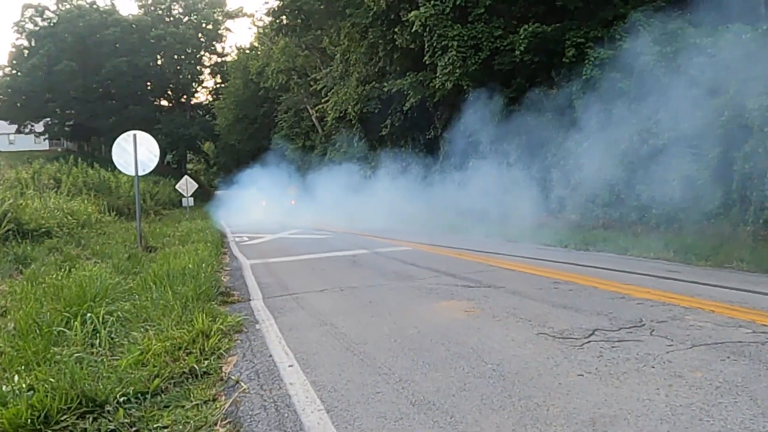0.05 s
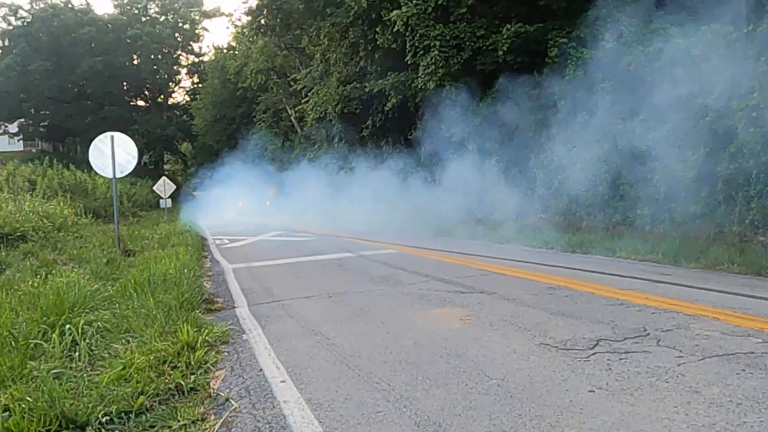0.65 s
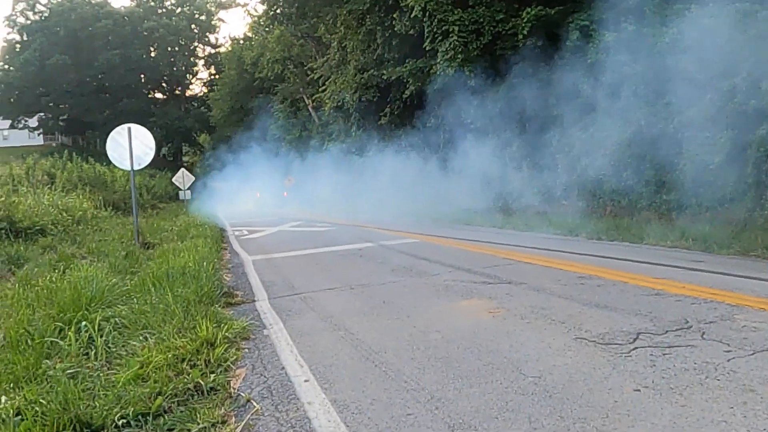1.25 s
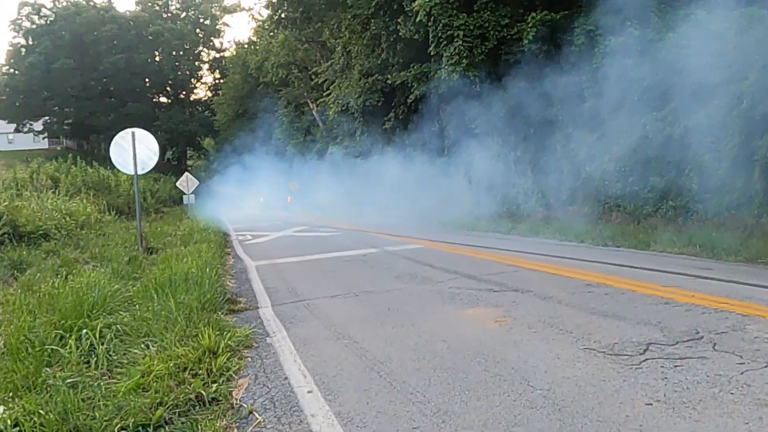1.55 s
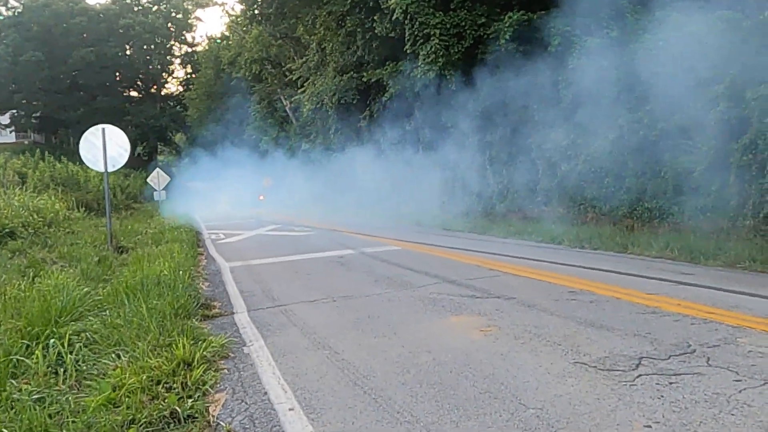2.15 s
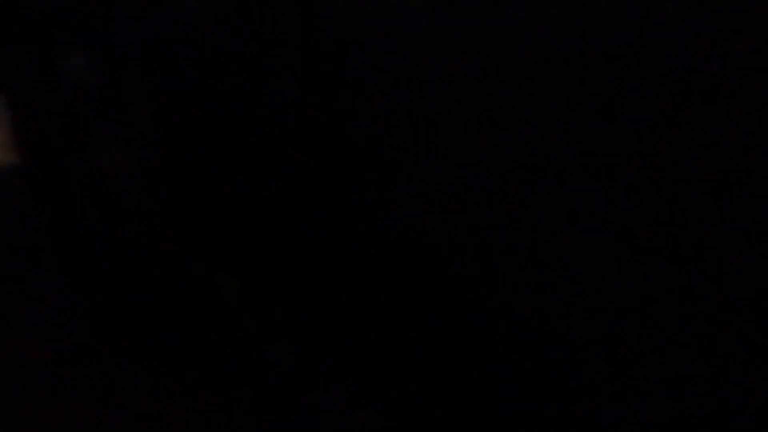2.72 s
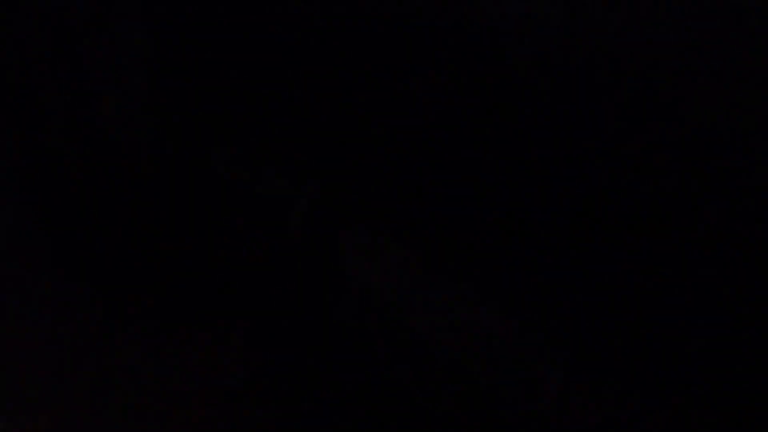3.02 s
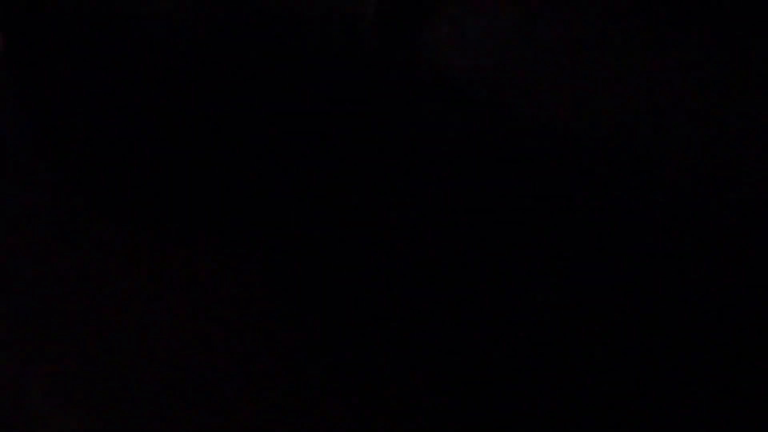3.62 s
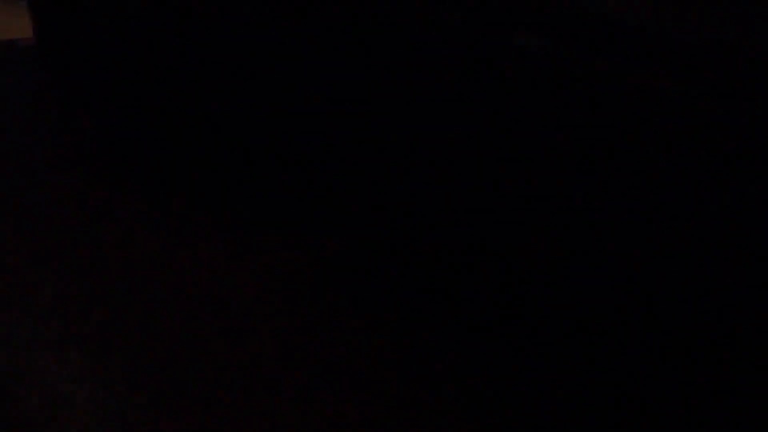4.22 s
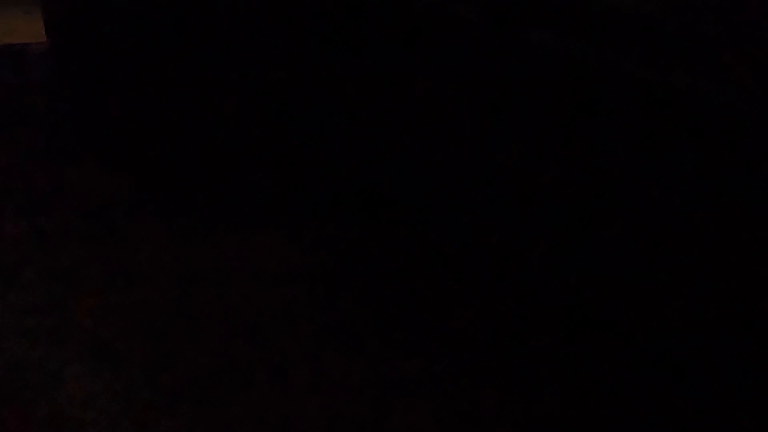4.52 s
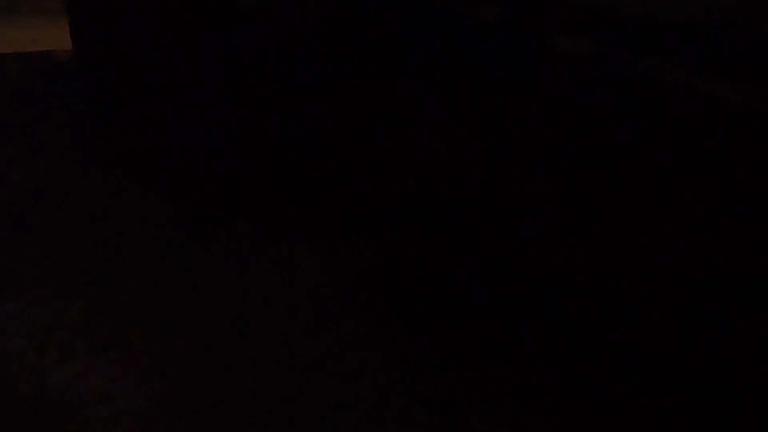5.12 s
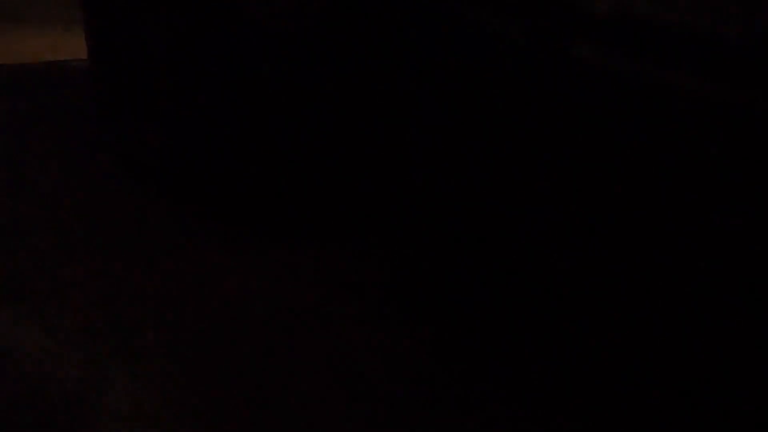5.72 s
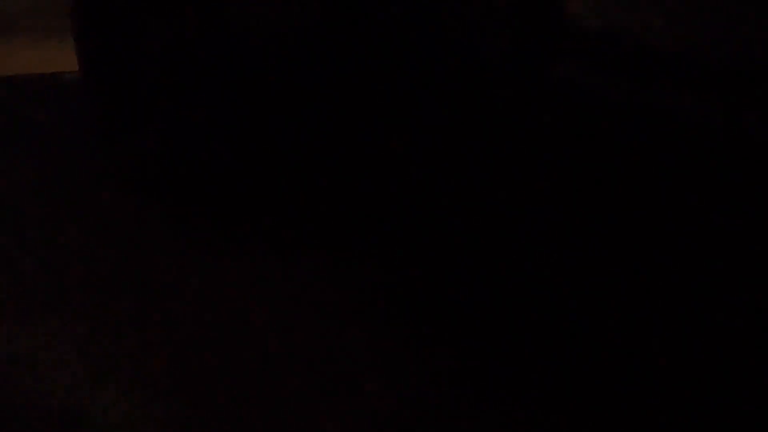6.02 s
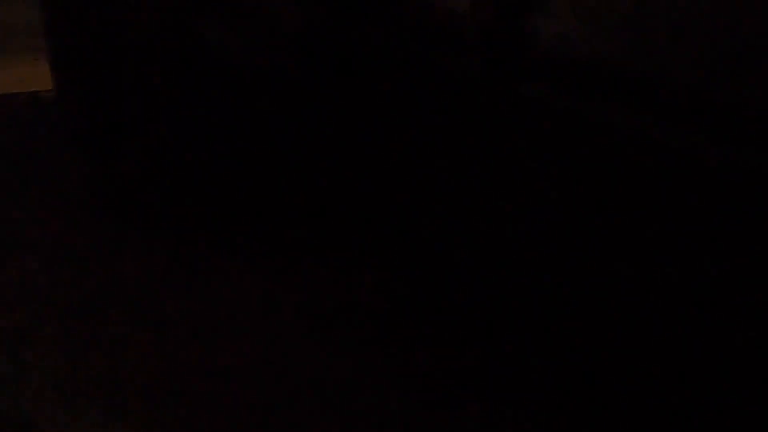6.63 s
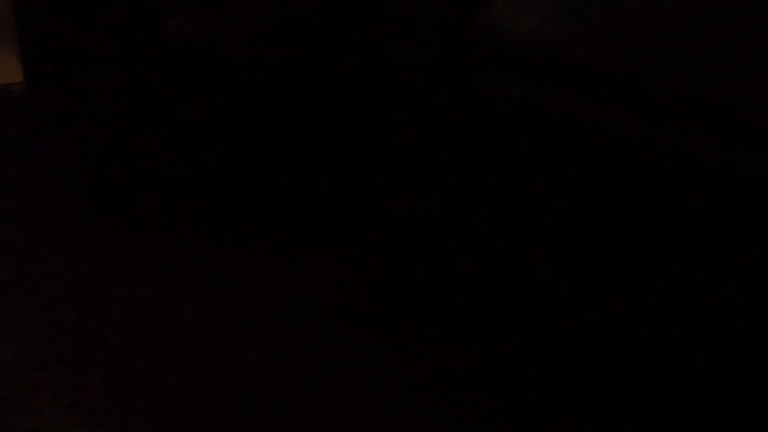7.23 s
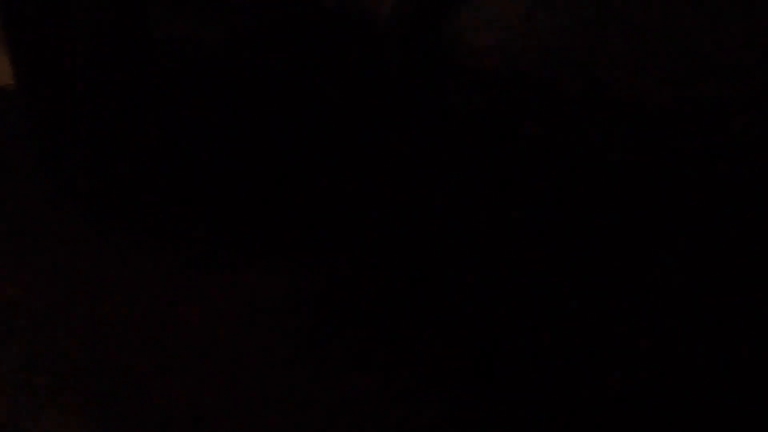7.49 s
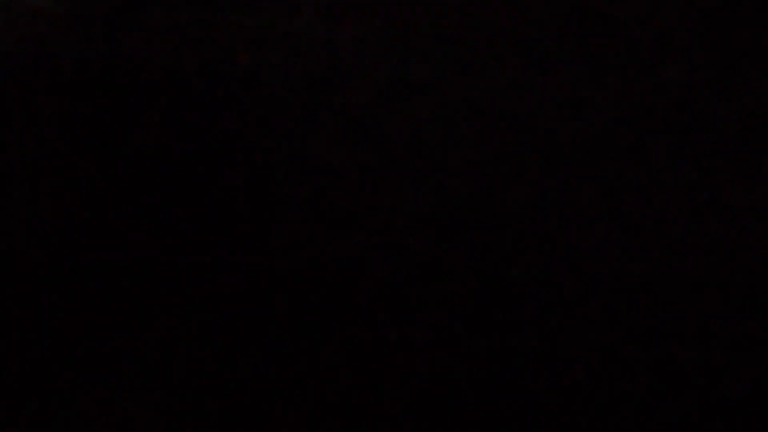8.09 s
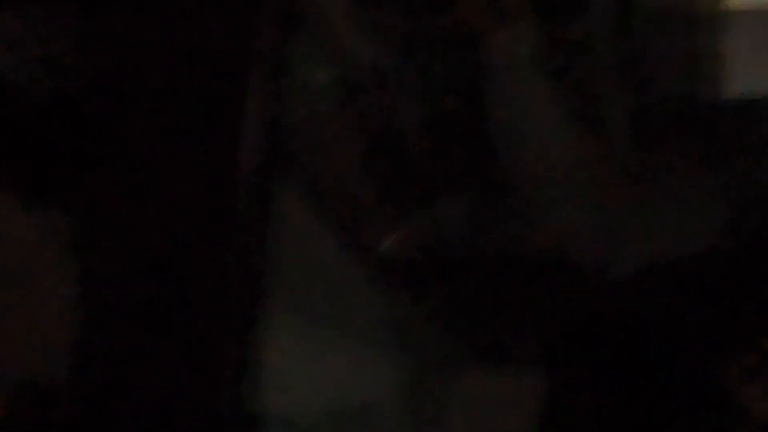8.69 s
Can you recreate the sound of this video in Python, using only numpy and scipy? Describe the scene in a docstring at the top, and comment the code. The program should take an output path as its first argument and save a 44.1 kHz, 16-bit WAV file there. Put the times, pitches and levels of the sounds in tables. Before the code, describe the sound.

Howling tyres and a labouring V8 truck engine cut off, then a steady low idle rumbles nearby with light ticking.

```python
"""V8 truck: wheelspin and idle

Far down a country road a truck spins its tyres: the engine sags under load and picks up, the rubber
howls and scrubs, grit ticks. After a short silence it idles close by at 600 rpm, with a deep exhaust
throb and ticking tappets. Each firing excites the resonances of pipe and metal; the eight cylinders
differ in strength, so the pattern repeats once per engine cycle and the idle lopes five times a second."""
import sys
import numpy as np
from scipy import signal
from scipy.fft import rfft, irfft, next_fast_len
from scipy.io import wavfile
from scipy.ndimage import uniform_filter1d, minimum_filter1d, map_coordinates

SR = 44100
rng = np.random.default_rng(int(sys.argv[2]) if len(sys.argv) > 2 else 0)


def store_pcm(level_fs):
    """Save levels as 16-bit WAV."""
    pcm = np.round(np.clip(level_fs, -1, 1) * 32767).astype(np.int16)
    wavfile.write(sys.argv[1], SR, np.atleast_2d(pcm).T)


N = 394694

# idling cylinders in firing order: chuff_db, pipe_db, rasp_db, shell_db, tappet_db, clatter_db
CYLINDERS = [(-1, -10, -1.5, 0, 3.5, 3), (-3, -4.5, -1, 1.5, -1.5, 7.5), (1, -11, 0.5, 2, -4, -2.5),
             (-0.5, 3.5, -1, -1, 5.5, 3), (0.5, 3, -4, 7, 1.5, 4.5), (-3, 6.5, 5.5, 5, -0.5, 2),
             (1.5, 1.5, 4.5, -3.5, 5.5, 3), (2.5, -7, 5.5, 0, -2, -4.5)]
CHUFF_DB, PIPE_DB, RASP_DB, SHELL_DB, TAPPET_DB, CLATTER_DB = np.transpose(CYLINDERS)


def amp(db):
    """Decibels to amplitude ratio."""
    return 10 ** (np.asarray(db) / 20)


def unit(x):
    """Normalisation to rms 1."""
    return x / np.sqrt(np.mean(x ** 2) + 1e-20)


def along(points, hz):
    """Interpolation of (frequency_hz, value) points on a logarithmic frequency axis."""
    f, v = np.transpose(points)
    return np.interp(np.log(hz + 1), np.log(f + 1), v)


def curves(rows):
    """Linear interpolation, sample by sample, of each column after the time."""
    s, *cols = np.transpose(rows)
    return [np.interp(np.arange(N) / SR, s, c) for c in cols]


def swells(rows, width_s):
    """A Gaussian swell for each (time_s, height) row."""
    t = np.arange(N) / SR
    return sum(height * np.exp(-.5 * ((t - s) / width_s) ** 2) for s, height in rows)


def wobble(rate_hz):
    """Slow random modulation: a spline through random knots."""
    return map_coordinates(rng.standard_normal(int(N * rate_hz / SR) + 4), [np.arange(N) * rate_hz / SR])


def filtered(x, response):
    """Linear filtering: the spectrum times a frequency response."""
    m = next_fast_len(N + SR // 4)
    return irfft(rfft(x, m) * response(np.fft.rfftfreq(m, 1 / SR)), m)[..., :N]


def coloured(x, spectrum):
    """Spectral shaping by (frequency_hz, level_db) points, at rms 1."""
    return unit(filtered(x, lambda hz: amp(along(spectrum, hz))))


def rung(x, modes):
    """Forced resonance: x drives (pitch_hz, width_hz, level_db) modes, at rms 1."""
    def response(f):
        return sum(amp(db) * (1.5j * f * width / (hz * hz - f * f + 1.5j * f * width)) ** 2
                   for hz, width, db in modes)
    return unit(filtered(x, response))


def spread(envelope):
    """Modulated stereo noise, less coherent with frequency: central bass, scattered treble."""
    # stereo width: frequency_hz, side_re_mid_db
    side_levels = [(100, -48), (300, -45.5), (700, -24.5), (1400, -17), (2800, -18), (12000, -10)]
    mid, side = rng.standard_normal((2, N)) * envelope
    side = filtered(side, lambda hz: amp(along(side_levels, hz)))
    return np.array([mid + side, mid - side])


def pulses(firings, cylinder_db, scatter_db, decay_s):
    """A pulse train: each whole count of firings starts a decay, sized by cylinder and chance."""
    at = np.flatnonzero(np.diff(np.floor(firings)) > 0) + 1
    cylinder = np.floor(firings[at]).astype(int) % len(cylinder_db)
    kicks = np.zeros(N)
    kicks[at] = amp(np.asarray(cylinder_db)[cylinder] + scatter_db * rng.standard_normal(len(at)))
    return unit(signal.lfilter([1], [1, -np.exp(-1 / (decay_s * SR))], kicks))


def tone(firings, order, waver_db, rate_hz):
    """A harmonic of the eight-firing cycle, randomly modulated in amplitude and phase."""
    phase = 2 * np.pi * (order * firings / 8 + rng.random())
    drift = waver_db * np.log(10) / 20 * wobble(rate_hz)
    return unit(amp(waver_db * wobble(rate_hz)) * np.sin(phase + drift))


def snap(start_s, hz, octaves, attack_s, t60_s):
    """A damped transient: band-limited noise around one pitch, with peak 1."""
    lead = 512
    t = np.maximum(np.arange(4096) - lead, 0) / SR
    f = np.fft.rfftfreq(len(t), 1 / SR) + 1
    burst = rng.standard_normal(len(t)) * (1 - np.exp(-t / attack_s)) * amp(-60 * t / t60_s)
    band = irfft(rfft(burst) * np.exp(-.5 * (np.log2(f / hz) / octaves) ** 2))
    return np.pad(band / np.abs(band).max(), (round(start_s * SR) - lead, N))[:N]


def outdoor_air():
    """Ambient noise, faint and uncorrelated between the ears."""
    # open air: frequency_hz, level_db
    air_spectrum = [(20, 5.5), (150, -13.5), (500, -9.5), (1500, -11.5), (4000, -18.5), (12000, -41.5)]
    return amp(-59.5) * coloured(rng.standard_normal((2, N)), air_spectrum)


def engine_hiss():
    """Stationary broadband noise, strongest near 7 kHz."""
    # hiss: frequency_hz, level_db
    hiss_spectrum = [(3000, -22), (6200, -4.5), (7050, 0.5), (7700, -6), (10000, -20), (15500, -26.5)]
    return coloured(spread(1), hiss_spectrum)


def flung_grit():
    """Impact transients: grit thrown by the tyres ticks."""
    # impacts: start_s, level_db, pitch_hz
    impacts = [(0.902, -30, 4300), (0.959, -35, 2500)]
    return sum(amp(db) * snap(s, hz, octaves=0.44, attack_s=.0003, t60_s=0.0074) for s, db, hz in impacts)


def spinning_tyres(firings, bite_db):
    """Friction noise: slipping rubber grows louder with its bite, and each firing jerks it."""
    # howl, scrub and steady rush of the wheels: frequency_hz, level_db
    howl_spectrum = [(1150, -49), (1530, -18), (1720, 5.5), (1800, -4), (1885, 3), (2020, -10),
                     (2200, -17.5), (2900, -49), (6000, -92)]
    scrub_spectrum = [(1900, -20), (2250, -9), (2850, -19.5), (3200, -2.5), (3600, -19), (4100, -11),
                      (4430, 1.5), (4750, -5.5), (5070, 1.5), (5500, -6.5), (6000, -22), (7500, -27),
                      (8700, -35.5), (12200, -44), (13800, -49)]
    rush_spectrum = [(600, -11.5), (1500, 2), (2300, -1), (2800, -4), (3600, -6.5), (4200, 0.5),
                     (5200, -12), (6000, -15.5), (7500, -15), (9000, -25), (14000, -42)]
    # surges of the howl: time_s, rise_db
    howl_surges = [(1.47, 5), (1.58, 2.5), (1.73, 7.5), (1.93, 4), (2.08, 7)]
    # chirps of slipping rubber: start_s, level_db, pitch_hz
    slips = [(0.7613, -40, 4940), (0.952, -36, 4780), (1.017, -36, 4800), (1.4471, -31.5, 4500),
             (1.5633, -34.5, 5000), (1.6098, -33, 4970), (1.699, -39, 3130), (2.2471, -31, 4500)]
    surge_db = swells(howl_surges, width_s=0.028)
    jerks = pulses(firings, [0], scatter_db=4.5, decay_s=0.0096)
    howl = amp(-47.5 + 1.06 * bite_db + surge_db) * coloured(spread(jerks + 0.37), howl_spectrum)
    scrub = amp(-53 + 1.54 * bite_db + 0.17 * surge_db) * coloured(spread(jerks + 0.59), scrub_spectrum)
    rush = amp(-54) * coloured(spread(jerks + 0.99), rush_spectrum)
    chirps = sum(amp(db - 4) * snap(s, hz, octaves=0.092, attack_s=.003, t60_s=0.043)
                 for s, db, hz in slips)
    return howl + scrub + rush + chirps


def exhaust_cracks():
    """Pressure transients: the exhaust cracks sharply under load."""
    # cracks: start_s, level_db
    crack_events = [(1.031, -31), (1.578, -23.5), (2.282, -20)]
    return sum(amp(db - 2.5) * snap(s, hz=1130, octaves=0.13, attack_s=.0015, t60_s=0.033)
               for s, db in crack_events)


def loaded_exhaust(firings, firing_hz, bite_db):
    """Source and filter: firing harmonics sweep the exhaust's response while gas puffs make noise."""
    # exhaust response to a firing tone: frequency_hz, gain_db
    exhaust_gain = [(56, -26), (70, -20), (81, -23.5), (95, -15), (112, -23), (126, -23.5), (135, -31.5),
                    (145, -27), (162, -39), (190, -37)]
    # harmonics from unequal cylinders: cycle_order, level_db
    burble_orders = [(4, -21.5), (5, -11.5), (6, -14), (7, -16.5), (9, -9.5), (10, -6), (11, -16.5),
                     (12, -25.5), (13, -34), (14, -17.5), (15, -21), (17, -32), (18, -28), (19, -28.5),
                     (20, -32), (21, -29)]
    # gas noise under load: frequency_hz, level_db
    rumble_spectrum = [(20, -30.5), (45, -10.5), (75, -8), (150, -4), (200, -9.5), (280, -20), (450, -22.5),
                       (700, -25), (1500, -86)]
    rasp_spectrum = [(210, -40.5), (350, -6.5), (381, -19.5), (470, -13), (522, -18), (562, -4), (692, 3),
                     (822, -14.5), (913, -4.5), (1130, -2.5), (1310, -7), (1520, -19.5), (1980, -46),
                     (3340, -120)]
    boom = amp(along(exhaust_gain, firing_hz)) * tone(firings, order=8, waver_db=0.6, rate_hz=13)
    boom += amp(along(exhaust_gain, 2 * firing_hz)) * tone(firings, order=16, waver_db=2.3, rate_hz=13)
    burble = amp(-22) * sum(amp(db) * tone(firings, order, waver_db=1.65, rate_hz=5)
                            for order, db in burble_orders)
    puffs = pulses(firings, [-1.5, -4.5, -4.5, -3.5, -3.5, -2, -2.5, -2.5], scatter_db=1.56, decay_s=0.01)
    rumble = amp(-34) * coloured(spread(puffs), rumble_spectrum)
    rasp = amp(-37 + 0.7 * bite_db) * coloured(spread(puffs + 0.21), rasp_spectrum)
    return boom + burble + rumble + rasp


def burnout():
    """Common excitation: one firing rate drives both the exhaust and the tyres."""
    # the engine sags under load and picks up: time_s, firing_hz
    revs = [(0, 94.4), (0.5, 82.67), (1.25, 72.1), (1.49, 70.66), (1.62, 60.5), (1.72, 56.27),
            (1.88, 63.17), (2.15, 77.7), (2.33, 83.6)]
    # the tyres ease, then bite ever harder: time_s, bite_db
    bite = [(0, -2), (0.55, -5), (0.95, 0), (1.8, 2), (2.33, 6.5)]
    firing_hz, = curves(revs)
    bite_db, = curves(bite)
    firings = np.cumsum(firing_hz) / SR
    exhaust = loaded_exhaust(firings, firing_hz, bite_db)
    return exhaust + spinning_tyres(firings, bite_db) + flung_grit() + exhaust_cracks()


def idle_gains():
    """Proximity and screening: the harsh idle settles; the listener draws near, then moves round it."""
    # by part: settled_db, start_change_db, near_change_db, screened_change_db
    part_levels = {"boom": (-14, -3.5, -0.5, -0.4), "rumble": (-29, 5.5, -1, 0.5),
                   "chuff": (-37.5, 8.5, 0.5, -0.5), "pipe": (-39, -1.5, 0, -5),
                   "rasp": (-40, 7.5, 1.5, -2.5), "shell": (-54.5, 9, 2, -0.5),
                   "tappet": (-62, 2, 2.5, -6.5), "clatter": (-53, 5.5, 2, 1.5),
                   "valves": (-56, 2.5, 7, -1.5), "hiss": (-78.5, 0.5, 15, 19.5)}
    t = np.arange(N) / SR
    start_s, settle_s, nearest_s, away_s, away_takes_s = 2.506, 0.68, 7.6, 7.88, 0.27
    harsh = np.exp(-((t - start_s) / settle_s) ** 2)
    screened = np.clip((t - away_s) / away_takes_s, 0, 1)
    near = swells([(nearest_s, 1)], width_s=0.63) * (1 - screened)
    return {name: amp(db + start_db * harsh + near_db * near + screened_db * screened)
            for name, (db, start_db, near_db, screened_db) in part_levels.items()}


def valve_train(firings, gain):
    """Impact excitation: closing valves tap the metal, which rings on."""
    # metal resonances: pitch_hz, width_hz, level_db
    tappet_modes = [(3012, 60, 0)]
    valve_modes = [(4190, 210, -7), (4568, 100, -2), (4710, 100, -3.5)]
    # spells in which a tappet rings out: time_s, rise_db
    tappet_spells = [(3.06, 10.5), (3.57, 7.5), (5.35, 8.5)]
    # clatter: frequency_hz, level_db
    clatter_spectrum = [(1700, -27.5), (2400, -10.5), (3000, -4), (3300, -12), (4100, -5), (4650, -6),
                        (5100, -8.5), (5550, -16.5), (5850, -13.5), (6400, -19.5), (7300, -18.5),
                        (9000, -27.5), (12300, -34.5), (15500, -48.5)]
    ticks = pulses(firings, TAPPET_DB, scatter_db=2.5, decay_s=0.0001)
    tails = 0.94 * spread(pulses(firings, TAPPET_DB, scatter_db=1.5, decay_s=0.009))
    tappet = gain["tappet"] * amp(swells(tappet_spells, width_s=0.08)) * rung(ticks + tails, tappet_modes)
    taps = pulses(firings, CLATTER_DB, scatter_db=4.5, decay_s=0.015)
    clatter = gain["clatter"] * coloured(spread(np.sqrt(taps) + 1.5), clatter_spectrum)
    valves = gain["valves"] * rung(spread(taps), valve_modes)
    return amp(wobble(rate_hz=14)) * (tappet + clatter + valves)


def muffler(firings, gain):
    """Forced vibration: exhaust blasts rasp and ring the muffler and its shell."""
    # rasping gas: frequency_hz, level_db
    rasp_spectrum = [(440, -32.5), (740, -8.5), (801, -10.5), (853, -4), (918, -9), (983, 2), (1050, -6),
                     (1290, -9), (1330, -18.5), (1410, -17.5), (1750, -15), (1920, -24.5), (2140, -20),
                     (2400, -31.5), (2600, -31.5), (3380, -50.5), (5720, -120)]
    # resonances: pitch_hz, width_hz, level_db
    muffler_modes = [(871.4, 25, -3.5), (1004.7, 26, -2.5), (1061, 50, -6)]
    shell_modes = [(1611, 37, -1.8), (1735, 21, 2.6), (1801, 34, -1.7)]
    blasts = pulses(firings, RASP_DB, scatter_db=2.0, decay_s=0.023)
    rasp = amp(-2.5) * coloured(spread(blasts + 0.75), rasp_spectrum)
    ring = amp(-3.5) * rung(blasts + 0.17 * spread(blasts), muffler_modes)
    knocks = pulses(firings, SHELL_DB, scatter_db=3.0, decay_s=0.012)
    return gain["rasp"] * (rasp + ring) + gain["shell"] * rung(spread(knocks), shell_modes)


def tailpipe(firings, gain):
    """Flow noise and pipe resonance: gas leaves in puffs, and each pressure front rings the pipe."""
    # escaping gas: frequency_hz, level_db
    rumble_spectrum = [(15, -6.5), (28, -10.5), (40, -11), (55, -8.5), (74, -3), (98, -8), (130, 1),
                       (165, -3.5), (200, -7.5), (228, -11.5), (260, -21), (400, -33), (900, -81.5)]
    chuff_spectrum = [(140, -38), (230, -12.5), (253, -9), (291, -2.5), (327, -4), (361, -8), (399, -7),
                      (414, -4.5), (500, -10), (610, -8), (659, -4), (722, -20), (780, -21.5), (1010, -50),
                      (1720, -120)]
    # pipe resonances: pitch_hz, width_hz, level_db
    pipe_modes = [(417, 26, 0), (465, 28, -5)]
    puffs = pulses(firings, CHUFF_DB, scatter_db=1.5, decay_s=0.017)
    rumble = gain["rumble"] * coloured(spread(puffs + 1.1), rumble_spectrum)
    chuff = gain["chuff"] * coloured(spread(puffs + 0.69), chuff_spectrum)
    bank_skew = 0.026 * np.cos(np.pi * firings)  # in firing intervals: one bank early, the other late
    fronts = pulses(firings + bank_skew, PIPE_DB, scatter_db=1.3, decay_s=0.016)
    return rumble + chuff + gain["pipe"] * rung(fronts + 0.5 * spread(fronts), pipe_modes)


def exhaust_throb(firings, gain):
    """A harmonic series on the engine cycle, strongest at twice the firing rate."""
    # harmonics from unequal cylinders: cycle_order, level_db, waver_db
    boom_orders = [(6, -26.5, 3), (11, -23.5, 0.5), (12, -14.5, 0.5), (13, -17.5, 2.5), (14, -8.5, 0.5),
                   (15, -18, 0.5), (16, -1, 0.6), (17, -16.5, 1), (19, -25, 2.5), (21, -23, 1.5),
                   (22, -22.5, 3.5), (23, -20.5, 3.5), (25, -16, 2.5), (26, -18, 1.5), (32, -21.5, 2),
                   (45, -30, 3)]
    boom = sum(amp(db) * tone(firings, order, waver_db, rate_hz=4.6) for order, db, waver_db in boom_orders)
    # the bass deepens at the end: the third firing harmonic fades as the first rises
    deepening_s = np.maximum(np.arange(N) / SR - 8.03, 0)
    hum = amp(-21 - 18 * deepening_s) * tone(firings, order=24, waver_db=0.17, rate_hz=5)
    thud = amp(-30 + 8.5 * deepening_s) * tone(firings, order=8, waver_db=2.5, rate_hz=3.4)
    return gain["boom"] * boom + hum + thud


def idle():
    """Periodic excitation: each cylinder drives exhaust and metal with its own strength."""
    # steady but for one stumble: time_s, firing_hz
    idle_rate = [(3.69, 39.86), (4.36, 40.22), (4.78, 39.0), (5.33, 39.83), (7.06, 39.86), (7.92, 40.18)]
    # brief lulls in the rasp and clatter: time_s, change_db
    lulls = [(3.39, -7.5), (6.8, -4)]
    gain = idle_gains()
    firing_hz, = curves(idle_rate)
    firings = np.cumsum(firing_hz) / SR
    firings = firings - firings[round(3.585 * SR)]  # the first cylinder fires at this moment
    exhaust = exhaust_throb(firings, gain) + tailpipe(firings, gain)
    rattle = muffler(firings, gain) + valve_train(firings, gain)
    return exhaust + amp(swells(lulls, width_s=0.023)) * rattle


def scene():
    """Superposition on outdoor air: the burnout stops dead; after a silence the idle fades in."""
    burnout_gate, = curves([(2.346, 1), (2.351, 0)])
    idle_gate, = curves([(2.588, 0), (2.67, 1), (8.945, 1), (8.95, 0)])
    air = outdoor_air()
    return burnout_gate * (burnout() + air) + idle_gate ** 2 * (idle() + air)


def record(dry):
    """Peak limiting and band limiting: the highest peaks are rounded off, the top treble removed."""
    ceiling, top_hz = 0.5, 15700
    needed = np.minimum(1, ceiling / (np.abs(dry).max(axis=0) + 1e-9))
    gain = uniform_filter1d(minimum_filter1d(needed, size=1200), size=1200)
    return filtered(dry * gain, lambda hz: hz < top_hz)


dry = scene()
out = record(dry)
store_pcm(out)
```